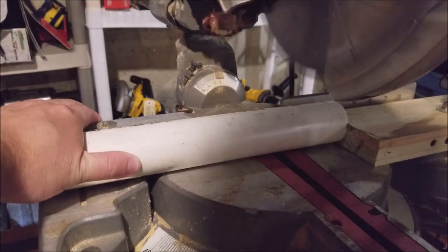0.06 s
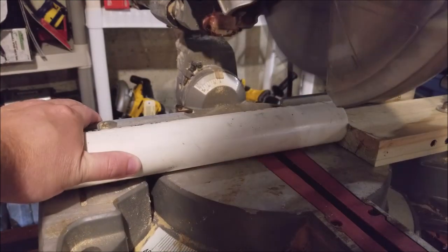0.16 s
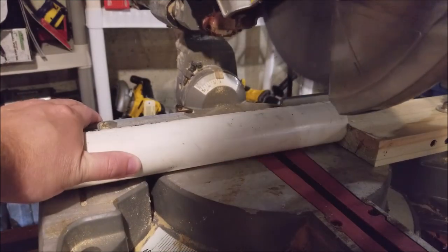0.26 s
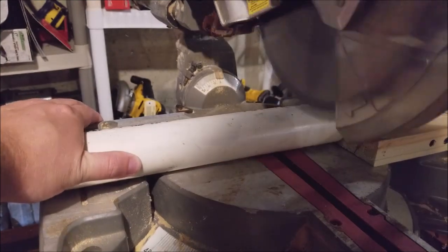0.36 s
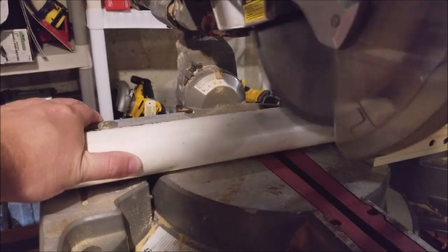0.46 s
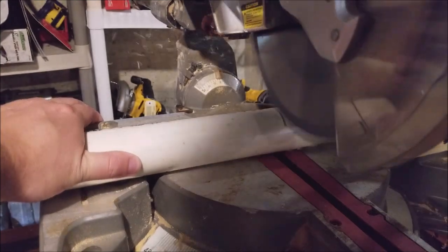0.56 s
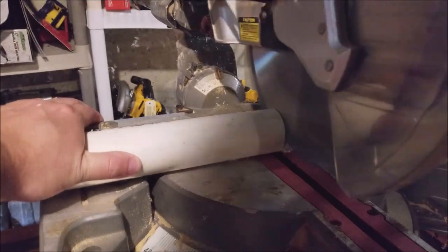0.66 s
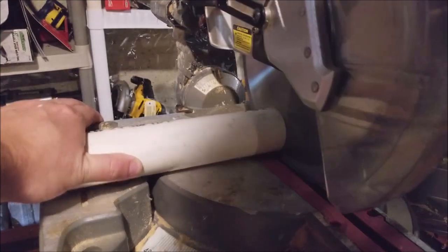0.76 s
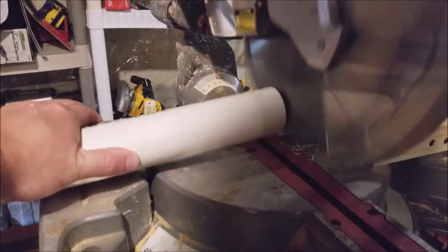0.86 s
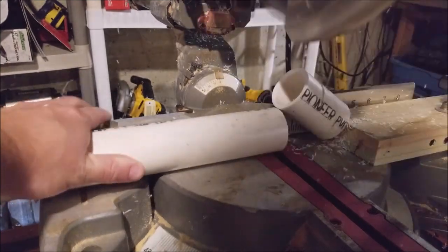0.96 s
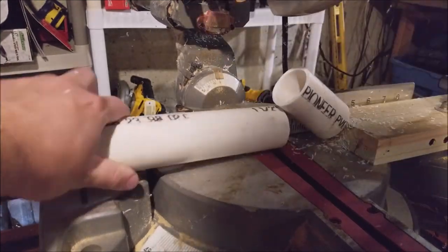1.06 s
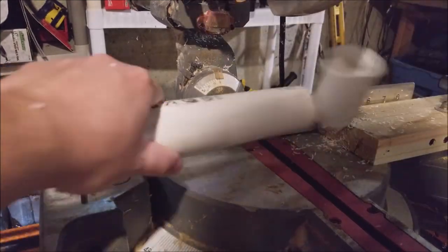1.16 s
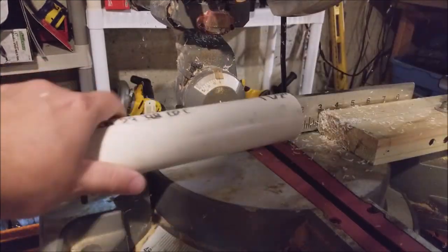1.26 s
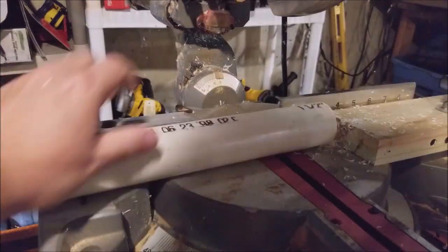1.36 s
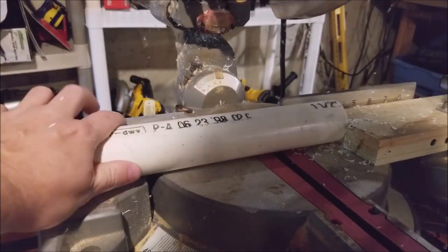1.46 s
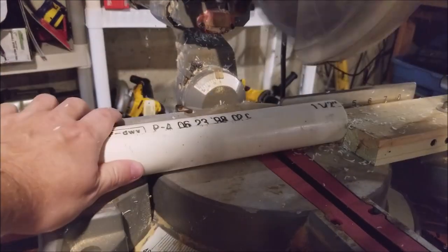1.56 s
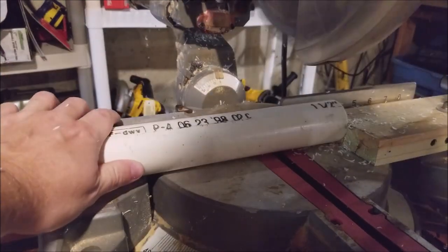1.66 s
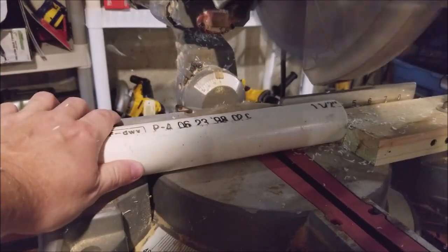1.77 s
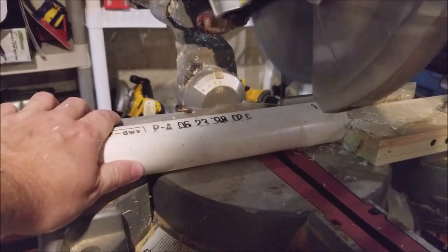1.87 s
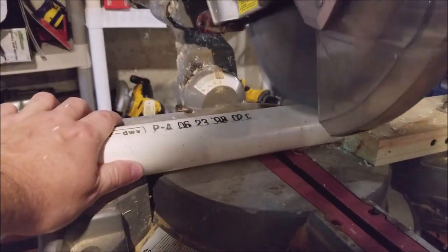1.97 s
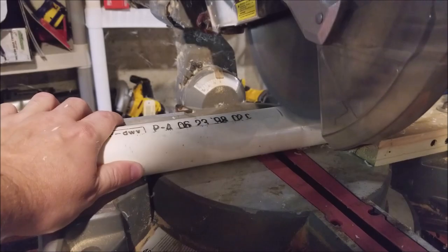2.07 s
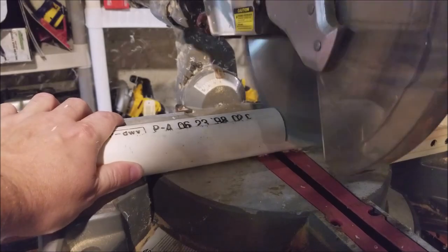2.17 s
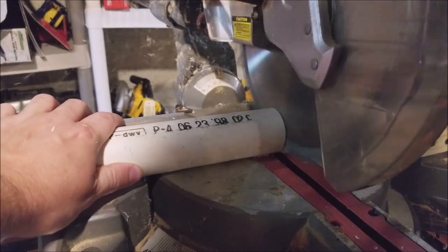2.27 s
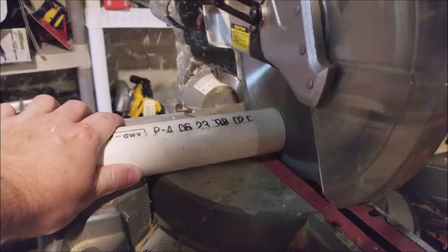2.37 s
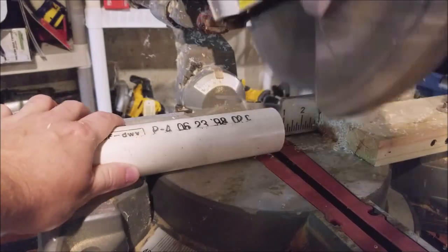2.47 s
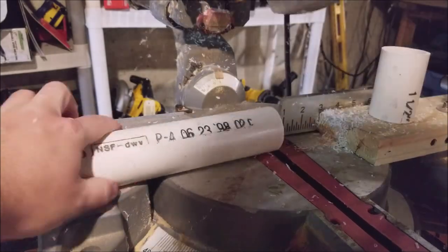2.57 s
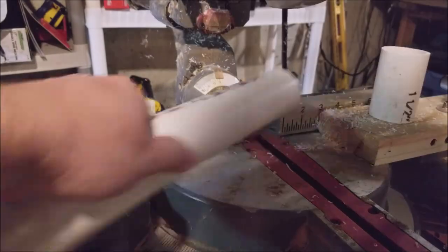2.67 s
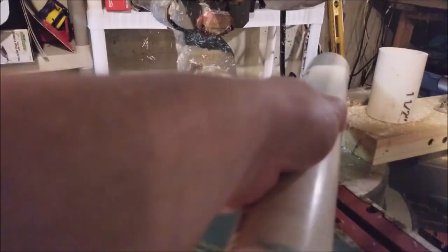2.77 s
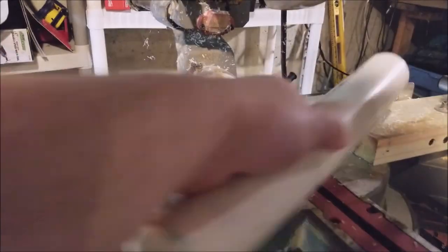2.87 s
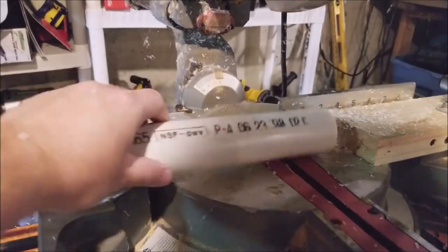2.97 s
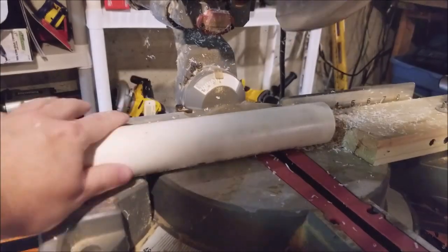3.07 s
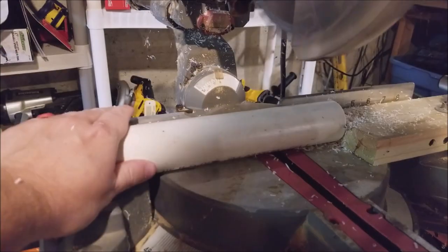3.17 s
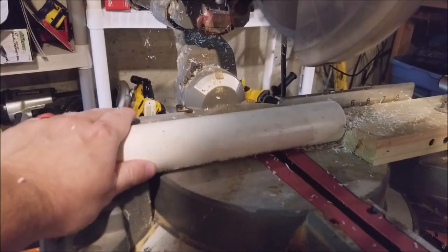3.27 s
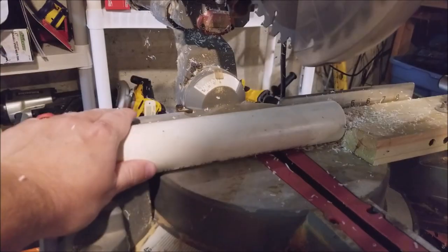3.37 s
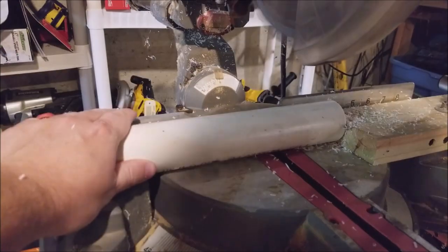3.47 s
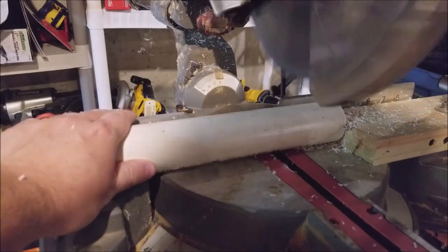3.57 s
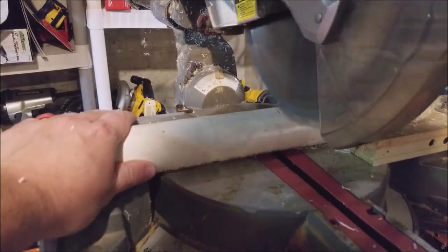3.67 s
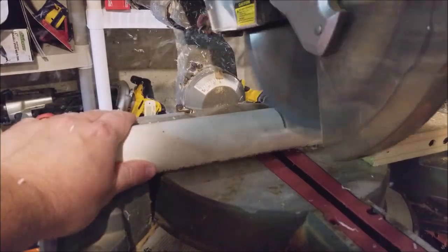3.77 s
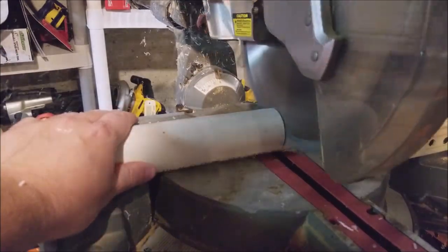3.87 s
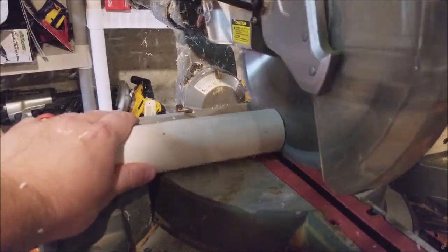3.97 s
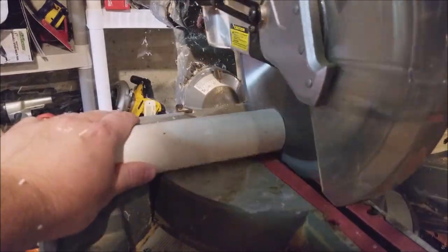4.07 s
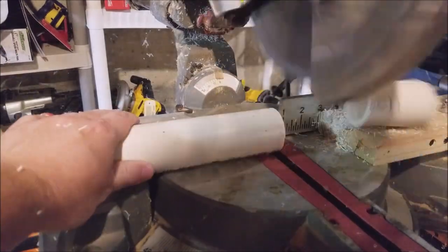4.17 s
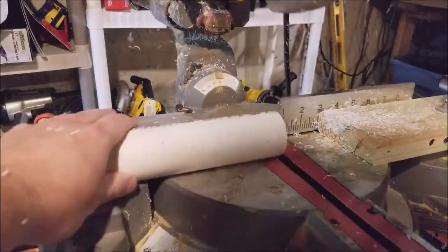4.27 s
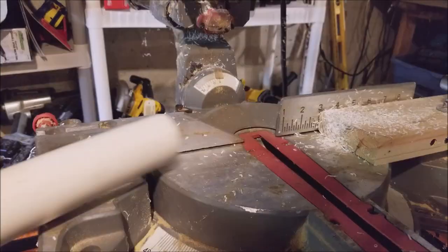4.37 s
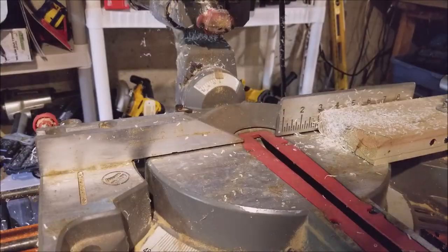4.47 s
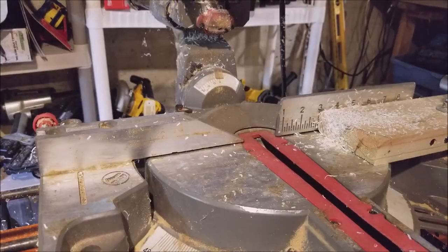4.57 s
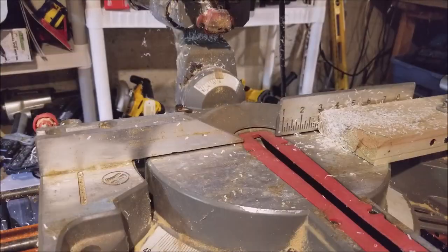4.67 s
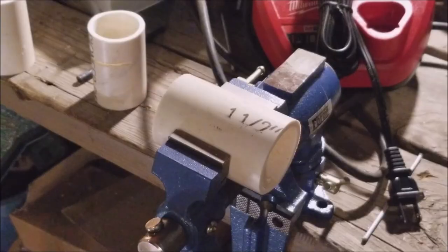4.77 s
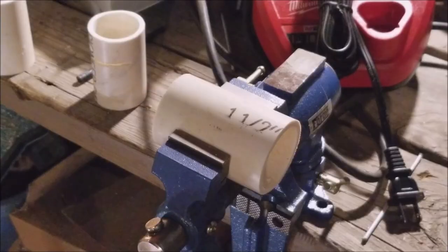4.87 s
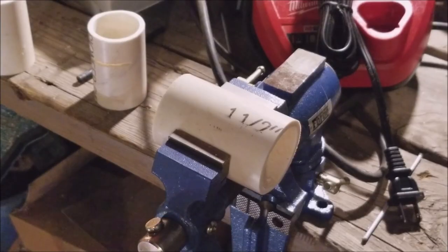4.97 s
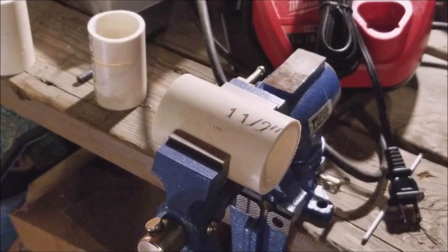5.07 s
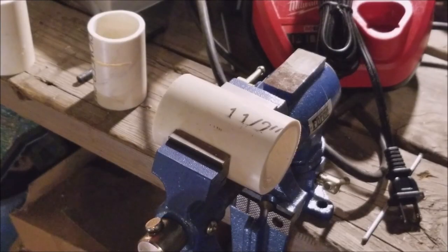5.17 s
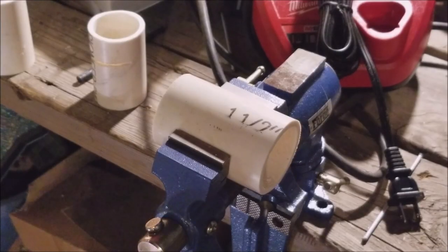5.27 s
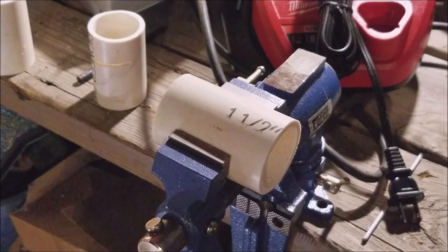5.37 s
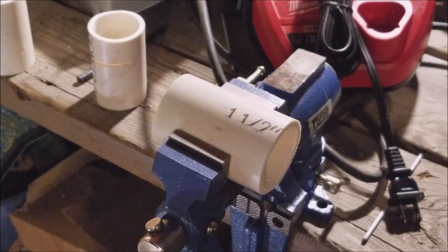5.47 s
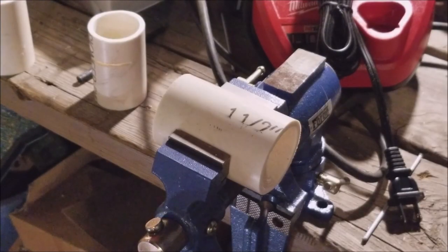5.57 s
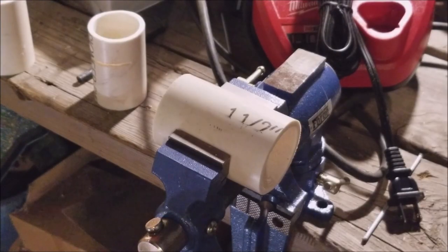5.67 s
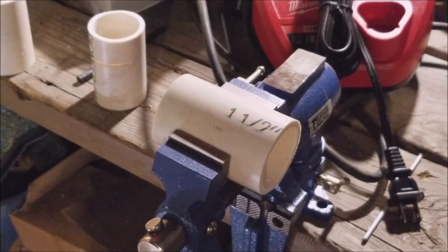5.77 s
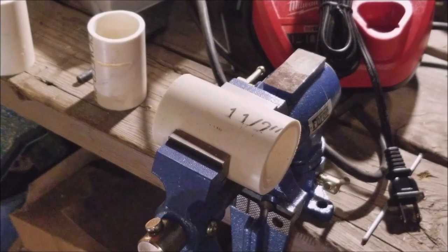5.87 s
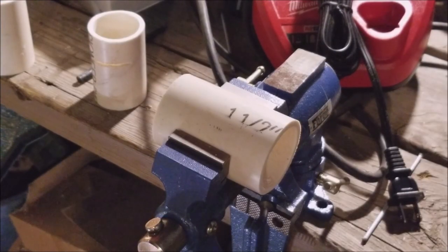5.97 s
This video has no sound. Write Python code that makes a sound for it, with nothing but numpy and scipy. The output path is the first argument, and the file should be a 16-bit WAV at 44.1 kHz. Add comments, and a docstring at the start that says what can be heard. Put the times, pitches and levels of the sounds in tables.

```python
"""A miter saw close by cuts plastic pipe three times in a small workshop: the motor jolts on, whines up to
speed, sags in the pipe and is braked. Filtered noise and tones follow the rotor; waves on the commutator's
rim squeal as it stops. Short noise bursts strike resonances for the arm thumping home and the pipe clattering
as it is moved along. Shop air is coloured noise; abruptly, a quiet bench with a low hum of steady tones follows."""
import sys
import numpy as np
from scipy import signal
from scipy.fft import rfft, irfft, next_fast_len
from scipy.io import wavfile
from scipy.ndimage import uniform_filter1d, map_coordinates

SR = 44100
rng = np.random.default_rng(int(sys.argv[2]) if len(sys.argv) > 2 else 0)


def to_wav(sig):
    """Store sig (one row per channel, or 1-D mono) as 16-bit WAV at the path in sys.argv[1].

    Samples outside -1..1 are clipped; the rate is SR.
    """
    pcm = np.clip(np.atleast_2d(sig), -1, 1) * 32767
    pcm = np.round(pcm).astype(np.int16)
    wavfile.write(sys.argv[1], SR, pcm.T)  # frames by channels


N = 265526
TIME = np.arange(N) / SR
SIZE = next_fast_len(N, True)
FREQS = np.maximum(np.arange(SIZE // 2 + 1) * SR / SIZE, 1)

# stages of each cut: (switched on [s], teeth enter [s], teeth leave [s], brake [s], end [s],
# lift of the commutator whine [dB])
CUT_STAGES = [(0.132, .645, .857, 1.03, 1.706, 3), (1.722, 2.175, 2.44, 2.555, 3.532, 5),
              (3.536, 3.82, 4.125, 4.27, 4.779, 11)]
# how each cut is pushed: (share of speed lost in the pipe [1], time to the deepest sag [s],
# free-running level [dB], fade after braking [dB/s])
CUT_PUSHES = [(.145, .32, -1, 26.5), (.142, .33, 1, 52.5), (0.12, .33, 0, 74)]
TOP_SPEED_HZ, SPIN_UP_S, SPIN_UP_SHAPE = 354, .094, .69   # turns per s; a quick start, a long approach
SAG_LEAD_S, SAG_SHAPE = .115, 3.0   # the rotor feels the pipe just before the teeth are in
BRAKE_S = .15   # time constant of the braked rotor


def rotor_speed():
    """Rotor dynamics: torque against inertia spins it up, the pipe's load makes it sag, the brake slows it."""
    speed = np.zeros(N)
    for (on, enter, _, brake, _, _), (sag, deepest_s, _, _) in zip(CUT_STAGES, CUT_PUSHES):
        now = TIME[TIME >= on]
        powered = np.minimum(now, brake)
        free = TOP_SPEED_HZ * (1 - np.exp(-((powered - on) / SPIN_UP_S) ** SPIN_UP_SHAPE))
        depth = np.maximum(powered - enter + SAG_LEAD_S, 0) / deepest_s
        load = (depth * np.exp(1 - depth)) ** SAG_SHAPE
        braking = np.exp(-(now - powered) / BRAKE_S)
        speed[TIME >= on] = free * (1 - sag * load) * braking
    return speed


def motor(speed):
    """Superposition: broadband roar, with the tones of iron, gears, blade and commutator on top."""
    rasp, hiss = effort(speed, index=0), effort(speed, index=1)
    entered = sum(gate(enter - .04, end - .1, 0.15) for _, enter, _, _, end, _ in CUT_STAGES)
    roar = motor_roar(speed, rasp, hiss)
    tones = gear_tones(speed, hiss, entered) + commutator_whine(speed, hiss, entered)
    return roar + coil_hum(rasp) + tones


# noise of the motor: (frequency [Hz], density [dB per Hz])
RUMBLE_SPECTRUM = [(30, -70), (60, -52.5), (130, -29.5), (200, -5), (300, -8.5), (480, 2.5), (800, -3.5),
                   (1100, -10.5), (1800, -6.5)]
RASP_SPECTRUM = [(40, -89.5), (100, -69.5), (500, -29), (900, -18.5), (1300, -9), (1900, -2.5), (2800, 2.5),
                 (3700, 7.5), (4300, -14.5), (6000, -33), (12000, -34.5)]
# bright noise of air, brushes and teeth, also that of sharp ticks: (frequency [Hz], density [dB per Hz])
HISS_SPECTRUM = [(40, -87), (100, -60.5), (400, -35), (1000, -17.5), (2500, -10), (4500, -0.5), (6500, 1.5),
                 (8500, 2), (10500, 1), (12300, 3), (14000, -0.5), (16000, -1.5)]
# teeth chewing the pipe: (frequency [Hz], density [dB per Hz])
CHEW_SPECTRUM = [(40, -45), (90, -27), (150, -1.5), (250, 11), (700, 16), (1500, 9.5), (4000, -27.5)]
# steady whirr under each cut, from switch-on to its end, left bare as the blade runs out: (frequency [Hz],
# density [dB per Hz])
COAST_SPECTRUM = [(40, -62), (150, -34), (450, -7.5), (1400, -6), (2000, 0), (2500, -3.5), (3400, 3.5),
                  (4600, -6), (7000, 1), (11500, -7.5), (13000, -13.5), (15000, -32)]
# resonances of the saw's housing: (frequency [Hz], width [Hz], lift [dB])
HOUSING_MODES = [(496, 23, 6.5), (687, 66, 6.5), (955, 40, 5.5), (1250, 37, 8), (1500, 96, 2.5),
                 (1937, 120, 6), (2268, 78, 1.5), (2320, 29, -1), (2814, 96, 3.5), (3115, 48, 4),
                 (3430, 120, 3), (3624, 90, 0.5), (4660, 62, 3), (6800, 350, 1), (9760, 332, 2)]
# hollows in the motor's sound: (frequency [Hz], width [Hz], lift [dB])
MOTOR_HOLLOWS = [(384, 89, -13.5), (590, 88, -9), (845, 59, -14), (1132, 94, -3.5), (4396, 43, -4),
                 (4500, 55, -3.5)]


def motor_roar(speed, rasp, hiss):
    """Source and filter: noise pulsing with the rotor excites the resonant housing."""
    grind = grinding(speed)
    peaks_and_hollows = HOUSING_MODES + MOTOR_HOLLOWS
    running = sum(gate(on, end, 0.0045) for on, _, _, _, end, _ in CUT_STAGES)
    chewing = sum(gate(enter, leave, 0.011) for _, enter, leave, _, _, _ in CUT_STAGES)
    rumble_noise = chatter(white(), speed, depth=.3, grain_db=2.0, grain_rate=72)
    rasp_noise = chatter(grind, speed, depth=0.31, grain_db=0.45, grain_rate=250)
    hiss_noise = chatter(grind, speed, depth=0.11, grain_db=0.56, grain_rate=590)
    out = rasp * from_db(-16.5) * colour(rumble_noise, RUMBLE_SPECTRUM, peaks_and_hollows)
    out += rasp * from_db(1.5) * colour(rasp_noise, RASP_SPECTRUM, peaks_and_hollows)
    out += hiss * from_db(1.02) * colour(hiss_noise, HISS_SPECTRUM, peaks_and_hollows)
    # teeth chewing the pipe shake it against the fence
    chew_noise = chatter(white(), speed, depth=0.16, grain_db=1.5, grain_rate=150)
    out += chewing * from_db(-43) * colour(chew_noise, CHEW_SPECTRUM)
    out += running * from_db(-43) * colour(white(), COAST_SPECTRUM, HOUSING_MODES)
    return swing(out)


# hum of the motor, strongest as it starts: (frequency [Hz], level relative to the rasp [dB])
COIL_TONES = [(480, -27.5), (725, -26.5), (958, -25.5), (1435, -20.5), (1915, -20), (2395, -18),
              (3630, -16.5)]


def coil_hum(rasp):
    """Magnetic force: the motor's iron hums on multiples of the mains, most under the starting current."""
    return rasp * sum(from_db(db) * tone(hz, waver=0.99, flutter=30) for hz, db in COIL_TONES)


# tones of gears and blade: (multiple of rotor speed [1], level before the pipe [dB], level after [dB],
# power of the speed they grow with [1]); levels are relative to the hiss
GEAR_ORDERS = [(.98, -29.5, -33, 3.7), (1.85, -32, -38.5, 3), (2.45, -27, -32, 4), (2.9, -26.5, -29, 1.0),
               (4.44, -9, -21, 3.7), (7.3, -23.5, -40, 3), (9.4, -24, -27, 4), (10.3, -24.5, -25, 5),
               (11.45, -12.5, -17, 1.3)]
HOUSING_SHARE = 0.53   # share of the housing's lift that a tone gets as it sweeps through
MAIN_WHINE = 4   # row of the steadier main whine


def gear_tones(speed, hiss, entered):
    """Order tones: pitches locked to the rotor rise out of the roar as it gains speed, and sink with it."""
    out = np.zeros((2, N))
    housing_db = lift_db(FREQS, HOUSING_MODES)
    for k, (multiple, before_db, after_db, growth) in enumerate(GEAR_ORDERS):
        hz = multiple * speed
        db = before_db + entered * (after_db - before_db) + HOUSING_SHARE * np.interp(hz, FREQS, housing_db)
        waver = .45 if k == MAIN_WHINE else 1.6
        strength = hiss * ((speed + 1) / TOP_SPEED_HZ) ** growth * from_db(db)
        out += strength * tone(hz, waver, flutter=55)
    return out


# tones of the commutator: (multiple of rotor speed [1], level before the pipe [dB], level after [dB]),
# relative to the hiss
COMMUTATOR_ORDERS = [(38.3, -23, -12.5), (40.1, -13, -22)]
# resonance that the commutator sweeps through: (frequency [Hz], lift [dB])
COMMUTATOR_RESONANCE = [(10300, -14.5), (11200, -1), (11700, 1), (12300, 7), (12900, 2), (13250, -16.5)]


def commutator_whine(speed, hiss, entered):
    """Resonance: the whine sings out while it sweeps through the response near 12 kHz."""
    out = np.zeros((2, N))
    sparking = sum(from_db(db) * gate(on, leave - .09, 0.086) for on, _, leave, _, _, db in CUT_STAGES)
    for multiple, before_db, after_db in COMMUTATOR_ORDERS:
        hz = multiple * speed
        ring_db = np.interp(hz, *np.transpose(COMMUTATOR_RESONANCE))
        db = before_db + entered * (after_db - before_db) + ring_db
        out += sparking * hiss * from_db(db) * tone(hz, waver=.9, flutter=190)
    return out


# loudness at each stage of a cut: (gear rasp [dB], hiss of air, brushes and teeth [dB])
FREE_DB = (-20.5, -16.5)
IN_PIPE_DB = (-30.5, -23)
THROUGH_DB = (-31.5, -26)
FREE_GROWTH = 2.74   # the free-running roar grows as this power of the speed
ENTER_S, LEAVE_S = 0.16, 0.015   # time the teeth take to get in and out
FADE_DELAY_S = 0.013   # the roar begins to fade just after the brake bites


def effort(speed, index):
    """Power summation: jolt plus free run, cutting and braked fade, for the rasp (index 0) or hiss (1)."""
    free_db = FREE_DB[index] + FREE_GROWTH * 20 * np.log10((speed + 1) / TOP_SPEED_HZ)
    power = jolt(index) ** 2
    for (on, enter, leave, brake, end, _), (_, _, level_db, fade) in zip(CUT_STAGES, CUT_PUSHES):
        entered = ramp(enter, ENTER_S)
        cutting_db = IN_PIPE_DB[index] + ramp(leave, LEAVE_S) * (THROUGH_DB[index] - IN_PIPE_DB[index])
        db = (1 - entered) * (free_db + level_db) + entered * cutting_db
        db -= fade * np.maximum(TIME - brake - FADE_DELAY_S, 0)
        power += gate(on, end, 0.0041) * from_db(db) ** 2
    return np.sqrt(power)


# starting jolt: (rasp, hiss), level [dB] and fall [dB/s]
JOLT_DB, JOLT_FALL_DB_PER_S = (-13.5, -16.5), (100, 61)
JOLT_HOLD_S = 0.046


def jolt(index):
    """Starting transient: abrupt attack, hold and exponential decay, for the rasp (index 0) or hiss (1)."""
    out = np.zeros(N)
    for on, _, _, _, end, _ in CUT_STAGES:
        fallen_db = JOLT_FALL_DB_PER_S[index] * np.maximum(TIME - on - JOLT_HOLD_S, 0)
        out += gate(on, end, 0.0044) * from_db(JOLT_DB[index] - fallen_db)
    return out


# rush of the brushes: (multiple of rotor speed [1], width in multiples [1], lift [dB])
BRUSH_RUSH = [(38, 1.55, 4)]
GRIND_SHARE = .45   # share of the noise power that is locked to the rotor
GRIND_PEAKS_DB, GRIND_PEAKS_PER_ORDER = 3.5, 8   # unevenness of that part


def grinding(speed):
    """Frequency scaling: part of the gear, fan and brush noise holds rough partials gliding with the rotor."""
    orders = FREQS / TOP_SPEED_HZ
    places = [orders * GRIND_PEAKS_PER_ORDER]
    peaks = GRIND_PEAKS_DB * map_coordinates(rng.standard_normal(512), places, order=1)
    gain = rms_one(from_db(peaks + lift_db(orders, BRUSH_RUSH)))
    at_top_speed = irfft(rfft(white(), SIZE) * gain, SIZE)
    # reading the noise at the rotor's pace shifts all its partials together
    pace = speed / TOP_SPEED_HZ
    gliding = np.sqrt(pace) * [map_coordinates(side, [np.cumsum(pace)], order=2) for side in at_top_speed]
    return np.sqrt(GRIND_SHARE) * gliding + np.sqrt(1 - GRIND_SHARE) * white()


def chatter(noise, speed, depth, grain_db, grain_rate):
    """Amplitude modulation: noise pulses once a turn and is roughened by uneven tooth contacts."""
    pulse = 1 + depth * np.cos(2 * np.pi * np.cumsum(speed) / SR)
    return noise * rms_one(pulse * from_db(grain_db * drift(grain_rate)))


# depth of the shifts in the roar's colour: (frequency [Hz], depth [dB])
SWING_DEPTHS = [(150, 2), (400, 4.5), (1100, 4), (2000, 2.3), (16000, 2)]
SWING_WIDTH_HZ, SWING_PER_S = 150, 13   # grid of the shifts


def swing(x, size=1024):
    """Random colouring: slow shifts of colour open and close hollows in the roar."""
    hz, s, frames = signal.stft(np.float32(x), SR, nperseg=size)
    places = np.meshgrid(hz / SWING_WIDTH_HZ, s * SWING_PER_S, indexing="ij")
    shifts = rms_one(map_coordinates(rng.standard_normal((256, 128)), places, order=1))
    gain = from_db(np.interp(hz, *np.transpose(SWING_DEPTHS))[:, None] * shifts)
    gain = gain / np.sqrt(np.mean(gain ** 2, axis=1, keepdims=True))
    return signal.istft(frames * gain, SR, nperseg=size)[1][:, :N]


# waves running round the commutator's rim: (frequency at rest [Hz], waves round the rim, negative if
# backward [1], delay after braking [s], hold after braking [s])
RIM_MODES = [(6360, -4, .15, .4), (8080, -2, .16, .42), (8800, -2, 0, .33), (8800, 2, .06, .3),
             (13030, -4, .02, .42), (13080, 4, 0, .04), (13130, 4, .14, .42), (16050, -4, 0, .17)]
# strength of each of those waves: (first stop [dB], second stop [dB], third stop [dB])
RIM_LEVELS = [(-43, -41.5, -47), (-62, -34.5, -46), (-34.5, -39.5, -50), (-35.5, -40, -45),
              (-57, -42.5, -45), (-44, -35, -28), (-60, -49, -50), (-60, -30, -34)]
RIM_ATTACK_S, RIM_FALL_DB_PER_S = 0.032, 70   # the ringing lasts while the rotor still turns
# squeal of the brushes as the rotor creeps to rest: (start [s], end [s], level [dB], waver 0-1 [1])
BRUSH_SQUEALS = [(2.85, 3.382, -38.5, .9), (3.413, 3.54, -34.5, 0.15)]


def brake_squeal(speed):
    """Doppler splitting: forward and backward rim waves close in on their resting pitch as the rotor slows."""
    out = np.zeros((2, N))
    for (hz, waves, delay, hold), levels in zip(RIM_MODES, RIM_LEVELS):
        strength = np.zeros(N)
        for db, (_, _, _, brake, end, _) in zip(levels, CUT_STAGES):
            fallen_db = RIM_FALL_DB_PER_S * np.maximum(TIME - brake - hold, 0)
            ringing = gate(brake + delay, end - RIM_ATTACK_S, RIM_ATTACK_S)
            strength += ringing * from_db(db - fallen_db)
        out += strength * tone(hz + waves * speed, waver=1.16, flutter=140)
    for start, end, db, waver in BRUSH_SQUEALS:
        out += gate(start, end, 0.011) * from_db(db) * tone(6375, waver, flutter=130)
    return out


# pipe clacking on table and fence: (time [s], level [dB], treble share [dB], ring share [dB])
PIPE_CLACKS = [(1.2636, -11.5, -7.5, -11), (1.291, -19.5, -7.5, -10), (1.3497, -12.5, -8, -5.5),
               (1.411, -3, -9.5, -18.5), (1.431, -3.5, -6.5, -14), (1.446, -5, -11, -12.5),
               (1.457, -12.5, -11.5, -11), (1.549, -6, -0.5, -20.5), (1.6409, -9.5, 1.5, -24),
               (1.6902, -18, -5.5, -11), (2.9141, -15, 9, -3), (3.036, -12.5, 6.5, -15),
               (3.0396, -7, 1, -16), (3.0576, -16.5, -1, -8.5), (3.074, -22, -2, -8.5),
               (3.092, -21.5, -1.5, -12.5), (3.098, -8.5, 2, -8.5), (3.1391, -8, 1, -22),
               (3.149, -14, -14, -16), (3.172, -23, -7.5, -7.5), (3.1938, -14.5, -8, -4.5),
               (3.2324, -13.5, 7.5, -22), (3.2915, -22.5, -4.5, -14), (3.306, -12.5, -3, -19),
               (3.362, -17, -1, -20.5), (3.366, -20.5, 0, -21.5), (3.406, -18.5, 1.5, -19),
               (3.45, -24.5, -0.5, -16), (4.328, -23.5, -6, -0.5), (4.404, -21, 8.5, -14),
               (4.722, -13, 0, -18), (4.7546, -17.5, -3, -16)]
# body of a clack: (frequency [Hz], density [dB per Hz])
CLACK_SPECTRUM = [(40, -39), (150, -26), (450, -5), (900, -4), (1500, -0.5), (3400, 6.5), (4600, -1),
                  (7000, -1.5), (11000, -7), (16000, -32)]
# ring of the pipe: (frequency [Hz], density [dB per Hz])
PIPE_SPECTRUM = [(300, -23), (1200, -6.5), (3000, 2.5), (4200, -0.5), (9000, -19.5)]
# modes of the pipe: (frequency [Hz], width [Hz], lift [dB])
PIPE_RESONANCES = [(1249, 140, 24), (1874, 100, 19), (2812, 50, 10.5), (3093, 164, 16), (3560, 160, 17)]
PIPE_CONTACT_S = .015   # decay of the drive: a clack drives the pipe only briefly; its modes ring on


def pipe_clatter():
    """Impact excitation: sharp clacks and sliding friction set the pipe's modes ringing."""
    rub, swish, hoot = slides()
    cracks = np.zeros((2, N))   # first instant of contact
    for s, db, _, _ in PIPE_CLACKS:
        cracks[0, int(s * SR)] = from_db(db + 1.5)
    clack_rows = [(s, db - 12, .03) for s, db, _, _ in PIPE_CLACKS]
    tick_rows = [(s, db + treble_db - 8.5, .012) for s, db, treble_db, _ in PIPE_CLACKS]
    ring_rows = [(s, db + ring_db + 1.5, PIPE_CONTACT_S) for s, db, _, ring_db in PIPE_CLACKS]
    clacks = bursts(clack_rows, tail_db=-8.5, tail_t60=0.11)
    ticks = bursts(tick_rows, tail_db=-22.5, tail_t60=0.18)
    rings = bursts(ring_rows, tail_db=-24, tail_t60=.2)
    body = colour(cracks + clacks + rub, CLACK_SPECTRUM, HOUSING_MODES)
    treble = colour(ticks + swish, HISS_SPECTRUM)
    return body + treble + colour(rings + hoot, PIPE_SPECTRUM, PIPE_RESONANCES)


# pipe sliding on the table and guard sliding on the blade cover: (start [s], end [s], body [dB],
# treble [dB], pipe ring [dB])
FRICTION_SLIDES = [(1.23, 1.417, -36, -57, -40), (2.502, 2.524, -25, -17.5, -50),
                   (2.82, 2.925, -34.5, -32, -49), (2.92, 3.232, -38, -50, -50),
                   (3.042, 3.104, -54, -52, -37.5), (4.193, 4.222, -19, -17.5, -54),
                   (4.546, 4.757, -32.5, -40.5, -59)]


def slides():
    """Dry friction: uneven noise, as body, treble and what it feeds into the pipe's ring."""
    grain = from_db(2.5 * drift(90))
    strengths = sum(np.outer(from_db(levels), gate(start, end, 0.034))
                    for start, end, *levels in FRICTION_SLIDES)
    return [strength * rms_one(grain * white()) for strength in strengths]


# arm, pipe and offcut knocking on the frame: (time [s], level [dB], decay by 60 dB [s])
FRAME_KNOCKS = [(.686, -22, 0.091), (.74, -29, 0.069), (.95, -31.5, 0.21), (2.245, -26, 0.085),
                (2.268, -28.5, 0.14), (2.52, -26, 0.057), (2.531, -14, 0.051), (3.147, -29, 0.06),
                (3.885, -24.5, 0.1), (3.915, -28.5, 0.095), (4.208, -27, 0.1), (4.222, -16.5, 0.054)]
# sound of a knock: (frequency [Hz], density [dB per Hz])
KNOCK_SPECTRUM = [(40, -29), (100, -12.5), (300, -0.5), (550, -2.5), (1000, -1.5), (1700, -9),
                  (3000, -13.5), (8000, -28.5)]


def frame_knocks():
    """Impact excitation: dull decaying blows are coloured by the frame and the housing's resonances."""
    return colour(bursts(FRAME_KNOCKS, tail_db=-21.0, tail_t60=0.13), KNOCK_SPECTRUM, HOUSING_MODES)


# air of the shop: (frequency [Hz], density [dB per Hz])
SHOP_SPECTRUM = [(30, -25.5), (120, -15.5), (450, 6.5), (750, -1.5), (950, -3.5), (1400, -2.5),
                 (3500, -6.5), (8000, -16.5), (16000, -29.5)]


def shop_air(saw):
    """Level-dependent gain: a brief burst of soft noise opens the sound; then air and a thin tone sink while
    the saw is loud."""
    opening_spectrum = [(40, -9), (150, 4.0), (400, -6.5), (800, 3.0), (1700, -7.5), (3000, -20), (15000, -27.5)]
    opening_burst = gate(-1, 0.041, 0.0093) * from_db(-39.0) * colour(white(), opening_spectrum)
    shop = from_db(-46) * colour(white(), SHOP_SPECTRUM) + from_db(-49.5) * tone(941, waver=0.6, flutter=19)
    saw_power = np.abs(uniform_filter1d(saw[0] ** 2, size=1500))
    shop /= np.sqrt(1 + saw_power / from_db(-33.0) ** 2)
    return opening_burst + gate(0.07, CUT_STAGES[-1][4], 0.0072) * shop


# air at the bench: (frequency [Hz], density [dB per Hz])
BENCH_SPECTRUM = [(18, -41), (30, -17.5), (113, -5), (200, -12), (288, -9.5), (320, -13.5), (511, -19),
                  (581, -23), (645, -21), (881, -21), (1270, -27), (1870, -29), (8250, -50.5), (13500, -46),
                  (15000, -65)]
# mains and fan tones at the bench: (frequency [Hz], level [dB])
BENCH_HUM = [(59.2, -54), (118.4, -49.5), (231.5, -53.5), (290.7, -47), (360.7, -65), (586.8, -63),
             (877.5, -70), (915.2, -67.5)]
# room modes skew the hum: (frequency [Hz], phase by which left leads [rad])
HUM_LEADS = [(59, 0.1), (118, 0.027), (231, -0.27), (291, -0.08), (600, -0.85)]


def quiet_bench():
    """Superposition: steady mains and fan tones over soft noise, with a treble sizzle that comes and goes."""
    bench = from_db(-44.5) * colour(white(), BENCH_SPECTRUM)
    sizzle_spectrum = [(1000, -30), (5000, -3), (8500, -7), (12000, -0.5), (14000, -2), (15500, -20)]
    bench += from_db(-72.5 + 3.5 * drift(9)) * colour(white(), sizzle_spectrum)
    for hz, db in BENCH_HUM:
        lead = np.interp(hz, *np.transpose(HUM_LEADS))
        bench += from_db(db) * tone(hz, waver=0.087, flutter=9.1, lead=lead)
    return gate(4.787, 7, 0.0053) * bench


# stereo likeness: (frequency [Hz], left-right correlation [1])
STEREO_LIKENESS = [(90, 1), (160, .65), (300, 0.76), (600, 0.73), (1100, 0.57), (2000, 0.89), (4000, 0.11),
                   (8000, .08), (13000, .2)]
# stereo balance: (frequency [Hz], left minus right [dB])
STEREO_BALANCE = [(100, 1), (250, 0.5), (500, 2), (1000, 1), (2000, 2), (4000, 1), (8000, 0), (13000, 1)]
LEFT_LAG_S, LAG_FADE_HZ = .00005, 3520   # sound reaches the left later; diffuse treble has no direction


def colour(x, spectrum, resonances=(), ripple_db=2.5):
    """Linear filtering: two unrelated signals become a stereo pair with spectrum, resonances and echo ripple."""
    # nearby echoes ripple the response
    ripple = ripple_db * map_coordinates(rng.standard_normal(1024), [FREQS / 40], order=1, mode="wrap")
    gain = from_db(in_freq(spectrum) + ripple + lift_db(FREQS, resonances))
    alike = np.clip(in_freq(STEREO_LIKENESS), -.99, .99)
    pan = in_freq(STEREO_BALANCE) / 2
    mid, side = rfft(x, SIZE) * causal(rms_one(gain))
    side = side * np.sqrt((1 - alike) / (1 + alike))
    lag = LEFT_LAG_S / (1 + (FREQS / LAG_FADE_HZ) ** 2)
    left = (mid + side) * from_db(pan) * np.exp(-2j * np.pi * FREQS * lag)
    right = (mid - side) * from_db(-pan)
    return irfft(np.array([left, right]), SIZE)[:, :N]


def causal(gain):
    """Minimum phase: the folded cepstrum gives a filter that rings only after it is struck."""
    cepstrum = irfft(np.log(gain + 1e-9), SIZE)[:SIZE // 2]
    cepstrum[1:] *= 2
    return np.exp(rfft(cepstrum, SIZE))


def tone(hz, waver, flutter, lead=0):
    """Multipath: a unit-power tone whose strength and phase flutter differently at each side through echoes."""
    turn = 2 * np.pi * (np.cumsum(np.broadcast_to(hz, N)) / SR % 1)
    pair = []
    for phase in np.float32([turn + lead, turn]):
        in_phase = (1 + waver * drift(flutter)) * np.cos(phase)
        pair.append(in_phase + waver * drift(flutter) * np.sin(phase))
    return rms_one(np.array(pair))


def bursts(rows, tail_db, tail_t60):
    """Exponential decay: noise of blows (time [s], level [dB], decay [s]), direct part and room tail."""
    power = np.zeros(N)
    for s, db, t60 in rows:
        at = int(s * SR)
        age = TIME[:min(SR // 2, N - at)]
        direct = from_db(-60 * age / t60) ** 2
        tail = from_db(tail_db - 60 * age / tail_t60) ** 2
        power[at:at + len(age)] += from_db(db) ** 2 * (direct + tail)
    return np.sqrt(power) * white()


def lift_db(hz, resonances):
    """Resonance: the summed lift of bell-shaped peaks at these frequencies."""
    return sum(db / (1 + (2 * (hz - centre) / width) ** 2) for centre, width, db in resonances)


def in_freq(points):
    """Logarithmic pitch: a spectrum joined by straight lines on a log-frequency axis."""
    hz, value = np.transpose(points)
    return np.interp(np.log(FREQS), np.log(hz), value)


def drift(rate):
    """Slow random process: a smooth unit-power wander with about `rate` turns a second."""
    steps = rng.standard_normal(8192)
    wander = map_coordinates(steps, [TIME[::16] * rate], order=2, mode="wrap")
    return rms_one(wander).repeat(16)[:N]


def white():
    """White noise: two unrelated signals of equal power at all frequencies."""
    return rng.standard_normal((2, N))


def gate(start, end, edge):
    """Linear envelope: one between two times; the ramps begin at start and at end."""
    return np.clip((TIME - start) / edge, 0, 1) * np.clip((end - TIME) / edge + 1, 0, 1)


def ramp(middle, length):
    """Linear transition: from zero to one around a moment."""
    return np.clip((TIME - middle) / length + .5, 0, 1)


def from_db(db):
    """Logarithmic level: decibels to amplitude gain."""
    return np.exp(np.asarray(db) * (np.log(10) / 20))


def rms_one(x):
    """Normalization: scale to unit mean power."""
    return x / np.sqrt(np.mean(x ** 2) + 1e-20)


def scene():
    """Superposition: the saw, its blows and the room add up."""
    speed = rotor_speed()
    saw = motor(speed) + brake_squeal(speed)
    blows = pipe_clatter() + frame_knocks()
    return saw + blows + shop_air(saw) + quiet_bench()


def record(dry):
    """Clipping and band limiting: peaks are held at full scale, then a steep low-pass cuts the top."""
    low_pass = signal.ellip(12, .1, 75, 15880, fs=SR, output="sos")
    return signal.sosfilt(low_pass, np.clip(dry, -1, 1))


dry = scene()
out = record(dry)
to_wav(out)
```